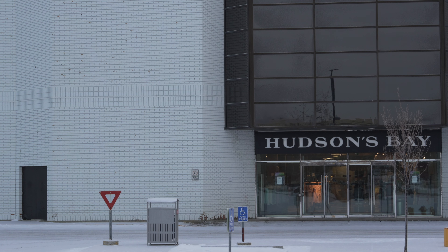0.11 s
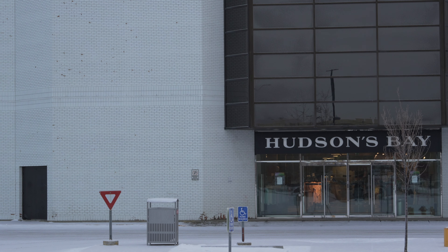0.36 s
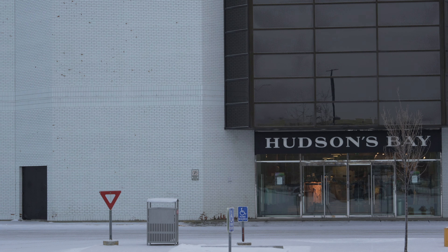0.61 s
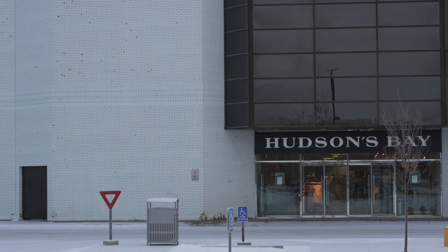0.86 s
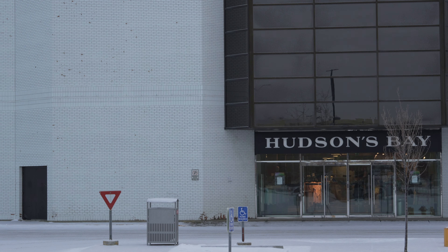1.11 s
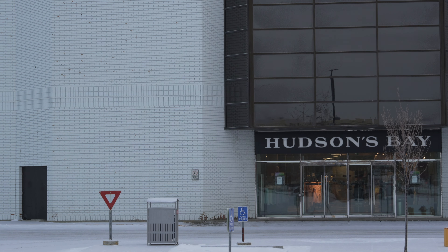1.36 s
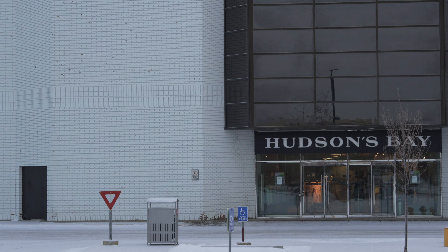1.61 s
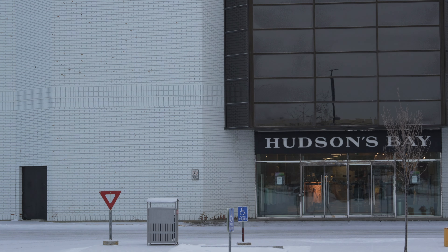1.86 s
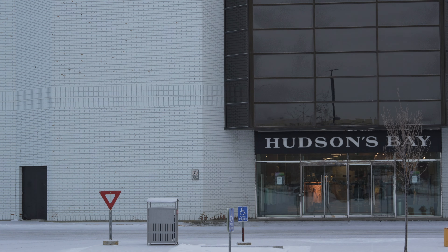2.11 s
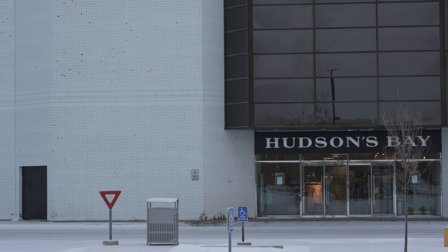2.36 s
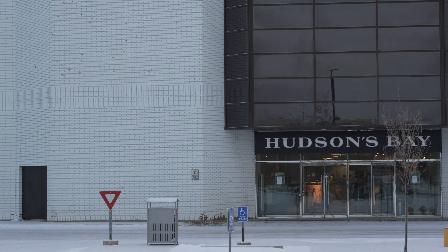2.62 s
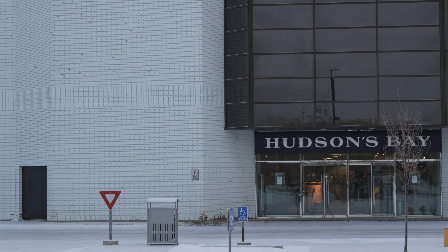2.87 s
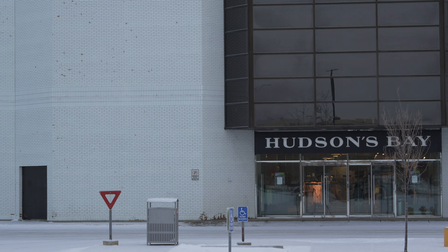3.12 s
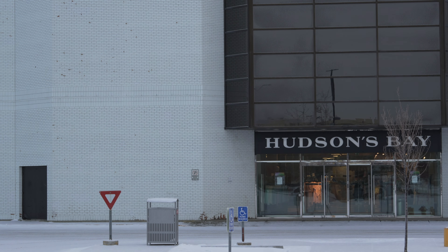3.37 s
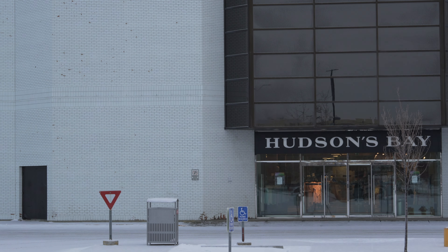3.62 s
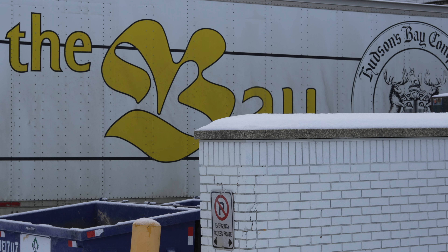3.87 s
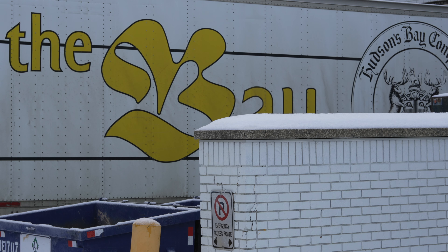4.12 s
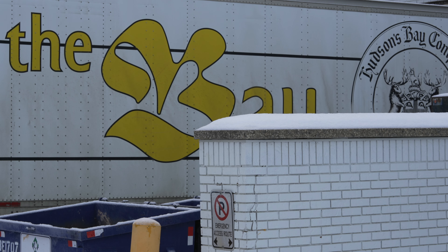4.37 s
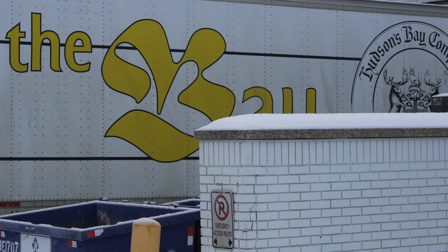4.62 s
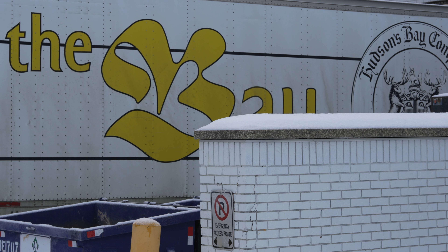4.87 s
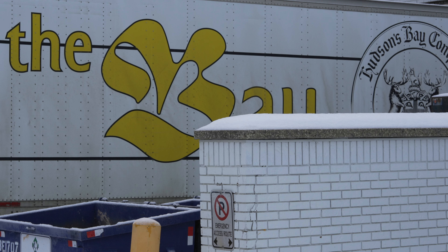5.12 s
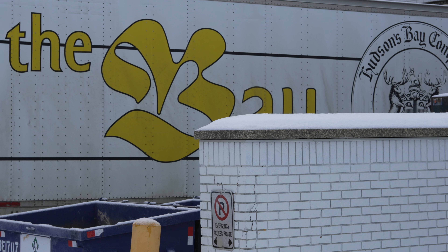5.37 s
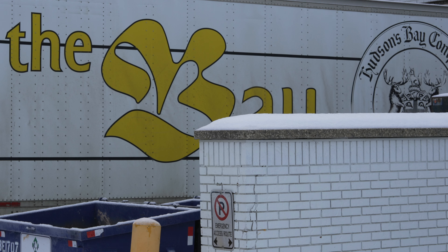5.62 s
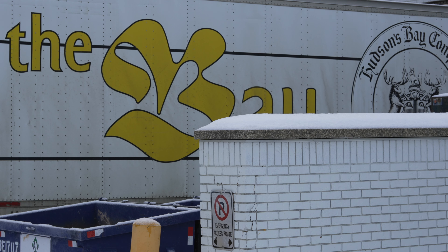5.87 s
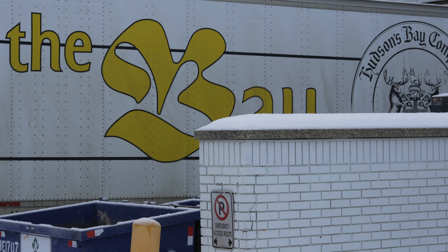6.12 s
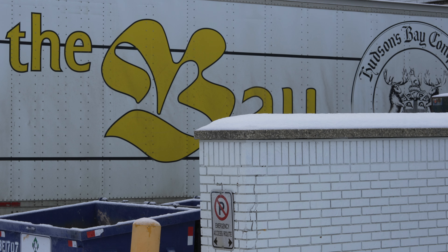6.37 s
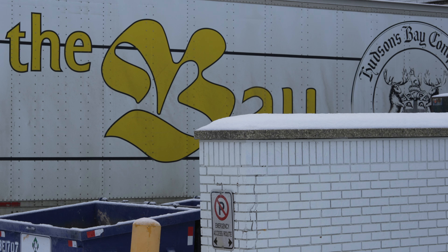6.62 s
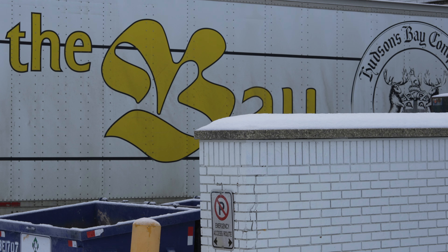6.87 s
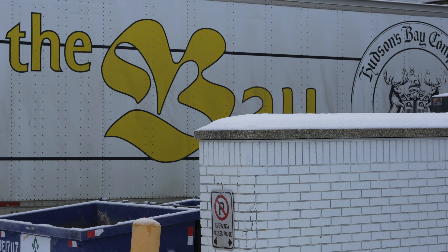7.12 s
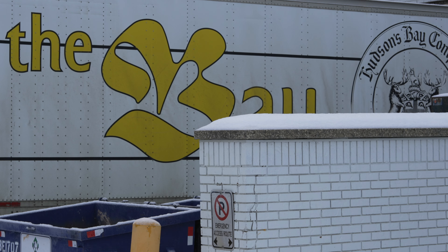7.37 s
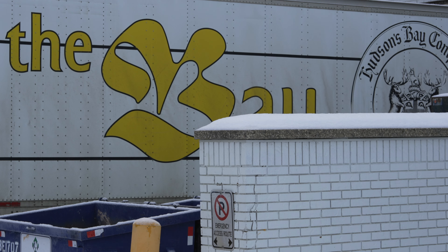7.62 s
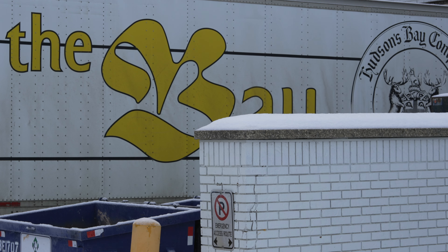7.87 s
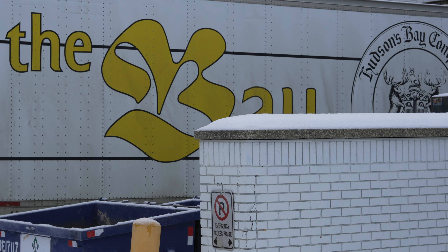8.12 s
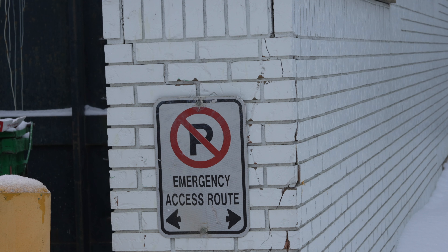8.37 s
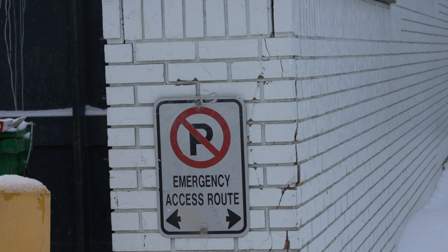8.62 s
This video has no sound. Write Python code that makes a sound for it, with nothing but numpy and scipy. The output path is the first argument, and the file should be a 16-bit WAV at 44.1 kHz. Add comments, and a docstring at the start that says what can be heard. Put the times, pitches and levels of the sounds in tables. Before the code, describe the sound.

In a snowy car park, a sweeper's fluttering broadband roar grows on the right over low town rumble, with crisp snow ticks and a few dull knocks. The sound cuts abruptly to a spot behind a wall: duller roar and a low diesel drone, slowing and wavering. A last cut brings a quieter corner, opening with a brief brushing swish close on the right. Small stereo outdoor microphone, faint hiss.

```python
"""A sweeper's roar, noise in three flickering bands, nears on the right in a snowy car park.
Three spots are heard in turn through a small stereo microphone: the roar; then a diesel, a sum of
slowing sine orders, behind a wall with the roar dulled; then a quieter corner, opening with a brushing
swish of dense random grains. Snow ticks as random short rings; gusts thump as low noise pushes.
Town rumble, coloured noise with wavering and briefly swelling sine hums, lies beneath, with faint hisses."""
import sys
import numpy as np
from scipy import signal
from scipy.fft import rfft, irfft
from scipy.io import wavfile
from scipy.ndimage import uniform_filter1d

SR = 44100
rng = np.random.default_rng(int(sys.argv[2]) if len(sys.argv) > 2 else 0)


def log_audio(samples):
    """Write samples as a 16-bit WAV file to the path given in sys.argv[1]."""
    # one column per channel
    frames = np.atleast_2d(samples).T
    # limit to full scale, then quantise
    limited = np.clip(frames, -1, 1)
    pcm = np.round(limited * 32767).astype(np.int16)
    wavfile.write(sys.argv[1], SR, pcm)


def decibels_to_gain(level_db):
    """Convert a level in decibels to a linear amplitude gain (20 dB per decade)."""
    exponent = np.asarray(level_db, float) / 20
    return 10 ** exponent


N = 384993
T = np.arange(N) / SR  # time of each sample, s
F = np.fft.rfftfreq(N, 1 / SR)  # frequency of each bin, Hz

# moments at which the listening spot changes: time_s
SPOT_CHANGES = [3.861, 8.366]
# phase lead of the left port over the right, negative when late: frequency_hz, lead_rad
PORT_LEAD = [(400, 0), (1030, .1), (1980, -.3), (3190, -2.), (4480, -2.8), (6290, -3.1), (7750, -6.4),
             (13200, -11.6)]


def level(x, db):
    """Normalisation: scale to an rms level."""
    return x * decibels_to_gain(db) / np.sqrt(np.mean(x ** 2))


def over_hz(table):
    """Interpolation on a logarithmic frequency axis, to every bin."""
    hz, value = np.transpose(table)
    return np.interp(np.log(F + 1), np.log(hz + 1), value)


def over_time(rows):
    """Linear interpolation of each column to every sample."""
    s, *columns = np.transpose(rows)
    return [np.interp(T, s, column) for column in columns]


def by_spot(rows):
    """Stepwise change: the columns of a table with one row per spot, on every sample."""
    return np.asarray(rows, float)[np.searchsorted(SPOT_CHANGES, T)].T


def walk(rate):
    """Slow random variation with spread near 1: held noise smoothed by two moving averages."""
    hold = int(SR / rate)
    steps = np.repeat(rng.standard_normal(N // hold + 1), hold)
    return 1.046 * uniform_filter1d(uniform_filter1d(steps, hold), hold)[:N]


def bump(centre_s, length_s):
    """Gaussian envelope, falling to 1/e one length from its centre."""
    return np.exp(-((T - centre_s) / length_s) ** 2)


def sides(pan_db):
    """Interaural level difference: left and right gains, positive toward the left."""
    return decibels_to_gain(np.array([pan_db, -pan_db]) / 2)


def ports(shared, own, colour, lean_db):
    """Partial coherence: a shared wave phase-shifted on the left, plus each port's own noise."""
    # power share common to both ports: frequency_hz, share_0_to_1
    coherence = [(40, .998), (70, .995), (120, .997), (200, .996), (380, .96), (640, .84), (1400, .58),
                 (3100, .55), (5500, .58), (8000, .3), (15000, .2)]
    alike = np.clip(over_hz(coherence), 0, 1)
    turn = np.exp(1j * over_hz(PORT_LEAD) * np.array([[1], [0]]))
    both = np.sqrt(alike) * turn * rfft(shared) + np.sqrt(1 - alike) * rfft(own)
    return level(irfft(both * decibels_to_gain(over_hz(colour)) * sides(lean_db), N), 0)


def noise(colour, lean_db):
    """Spectral shaping: coloured stereo noise at 0 dB rms, leaning to one side above the bass."""
    # how much of the lean applies: frequency_hz, share_0_to_1
    lean_share = [(200, 0), (380, .12), (700, .6), (1290, 1), (2380, 1), (4400, .35), (8000, 0)]
    return ports(rng.standard_normal(N), rng.standard_normal((2, N)), colour, lean_db * over_hz(lean_share))


def patchy(x, slow_db, quick_db):
    """Independent band modulation: neighbouring bands surge and flicker on their own."""
    # borders between bands: edge_hz
    band_edges = (90, 140, 210, 300, 420, 560, 750, 1000, 1350, 1800, 2400)
    below = [0 * F] + [1 / (1 + (F / hz) ** 8) for hz in band_edges] + [1 + 0 * F]
    spectrum = rfft(x)
    out = 0
    for lower, upper in zip(below, below[1:]):
        flicker = decibels_to_gain(slow_db * walk(5) + quick_db * walk(35))
        out = out + flicker * irfft(spectrum * (upper - lower), N)
    return out


def spots():
    """Gain switching: the first two spots crossfade; the last fades in from silence."""
    fade_out_s, fade_in_s = .0004, .009
    a, b = SPOT_CHANGES
    first = np.clip((a - T) / fade_out_s, 0, 1)
    second = (1 - first) * np.clip((b - T) / fade_out_s, 0, 1)
    third = np.clip((T - b) / fade_in_s, 0, 1)
    return first, second, third


def sweeper():
    """Broadband flow noise: casing drone, fan roar and brush hiss flutter apart; the wall dulls them."""
    # roar spectrum in the open: frequency_hz, density_db
    roar_open = [(120, -23), (170, 6), (280, -5), (400, -1.5), (534, -1.5), (892, -0.5), (1280, -5),
                 (1700, -13.5), (2200, -19), (2800, -22), (3500, -33), (4800, -37), (5800, -41.5),
                 (7500, -44.5), (9000, -52)]
    # roar spectrum behind the wall: frequency_hz, density_db
    roar_behind = [(200, -3.5), (330, -2.5), (520, 1), (800, -1.5), (1300, -4.5), (1900, -11.5),
                   (2400, -17.5), (2900, -27), (3600, -42), (5000, -63)]
    # loudness course: time_s, level_db, brush_over_level_db, drone_over_level_db
    sweep_course = [(0, -57.5, 11, 0), (.4, -47, -4, -4), (.8, -53, -8, 4), (1.15, -47, -8, 0.5),
                    (1.5, -44.5, 0, -1.5), (2.0, -45, 5, 5.5), (2.4, -45, 5.5, 3.5), (2.8, -43.5, 8, -0.5),
                    (3.05, -42, 3.5, -1.5), (3.45, -41, 2.5, -1), (3.85, -41, 4, -2), (3.87, -47, 3.5, -5),
                    (4.3, -48, 5, 3), (4.7, -45, -4.5, -0.5), (5.2, -48, 1.5, -3.5), (5.6, -50, 2.5, -2),
                    (6.1, -53, 0, 3), (6.5, -50.5, -2, -1), (6.9, -53, 7, -11), (7.3, -52, 7, -13),
                    (7.6, -49.5, 1, -12), (7.8, -52, -2, -6), (8.1, -50, 0, -6), (8.36, -49.5, 0, -8)]
    # brief flares of drone and fan: centre_s, rise_db, length_s
    roar_flares = [(2.03, 3, .03), (3.0, 4, .025)]
    # borders of drone, fan and brush: edge_hz
    part_edges = (700, 2250)
    flare_db = sum(db * bump(s, length) for s, db, length in roar_flares)
    first, second, _ = spots()
    roar = first * noise(roar_open, -14) + second * noise(roar_behind, -3.5)  # both lean right, dB
    spectrum = rfft(patchy(roar, slow_db=0.94, quick_db=1.5))
    low, below_top = (1 / (1 + (F / hz) ** 6) for hz in part_edges)
    drone = irfft(spectrum * low, N)
    fan = irfft(spectrum * (below_top - low), N)
    brush = irfft(spectrum * (1 - below_top), N)
    level_db, brush_db, drone_db = over_time(sweep_course)
    parts = decibels_to_gain(drone_db + flare_db + 1.2 * walk(20)) * drone
    parts = parts + decibels_to_gain(flare_db + .5 * walk(20)) * fan
    parts = parts + decibels_to_gain(brush_db + 1.7 * walk(9.4)) * brush
    return decibels_to_gain(level_db + 0.45 * walk(12)) * parts


def clanks():
    """Modal resonance: dull knocks ring the sweeper's casing modes, louder on the right."""
    # knocks, before mode gains and panning: time_s, drive_db
    casing_knocks = [(2.033, -33), (2.953, -36), (2.993, -22)]
    # casing modes: frequency_hz, gain_db, t60_s
    casing_modes = [(820, -1, .04), (940, -6, .035), (1240, -10, .03)]
    out = 0
    for s, db in casing_knocks:
        age = np.clip(T - s, 0, None)
        onset = 1 - np.exp(-(age / .0015) ** 2)
        ring = sum(decibels_to_gain(gain_db - 60 * age / t60) * np.sin(2 * np.pi * hz * age)
                   for hz, gain_db, t60 in casing_modes)
        out = out + decibels_to_gain(db) * onset * ring
    return out * sides(-7)[:, None] / 2


def diesel():
    """Harmonic orders: the lowest multiples of a slowing firing rate come round the wall."""
    # firing rate: time_s, rate_hz
    firing_rate = [(3.87, 58.6), (4.27, 57.5), (4.74, 56.9), (5.0, 55.8), (5.57, 54.4), (5.75, 53.4),
                   (6.2, 53.1), (6.45, 50.9), (6.75, 50.7), (6.9, 49.9), (7.2, 49.1), (7.57, 47.8),
                   (7.89, 46.4), (8.36, 46.4)]
    # firing tone: time_s, rms_db
    firing_tone = [(3.87, -45), (4.15, -46), (4.3, -35.5), (4.7, -32), (5.0, -32), (5.3, -30), (5.7, -32.5),
                   (5.9, -33.5), (6.1, -39), (6.28, -40), (6.42, -50), (6.55, -34.5), (6.9, -31.5),
                   (7.3, -46.5), (7.55, -47), (7.86, -35), (8.1, -36), (8.36, -39.5)]
    # second order: time_s, rms_db
    second_order = [(3.87, -48), (4.7, -51), (5.3, -69), (5.7, -47), (6.0, -44), (6.35, -46.5), (6.55, -54),
                    (6.9, -45.5), (7.1, -48), (7.3, -57), (7.55, -43), (7.8, -45), (8.0, -49),
                    (8.15, -41.5), (8.36, -47.5)]
    # higher orders: time_s, third_rms_db, fourth_rms_db
    upper_orders = [(3.87, -50, -60), (4.4, -51.5, -57), (4.65, -42.5, -60), (4.85, -54, -63),
                    (5.2, -53, -54.5), (5.6, -60, -66), (6.1, -53.5, -63), (6.6, -61, -59), (7.0, -60, -58),
                    (7.4, -59, -60), (7.7, -66, -56), (8.36, -66, -67)]
    rate_hz = over_time(firing_rate)[0] * (1 + .0015 * walk(9))
    turn = 2 * np.pi * np.cumsum(rate_hz) / SR
    out = decibels_to_gain(over_time(firing_tone)[0] + 0.81 * walk(25)) * np.sin(turn)
    out = out + decibels_to_gain(over_time(second_order)[0] + 1.5 * walk(7.5)) * np.cos(2 * turn)
    third_db, fourth_db = over_time(upper_orders)
    out = out + decibels_to_gain(third_db + 1.5 * walk(6)) * np.sin(3 * turn)
    out = out + decibels_to_gain(fourth_db + 1.5 * walk(6)) * np.cos(4 * turn)
    late = np.roll(out, 3)  # the left port, 3 samples behind
    return np.sqrt(2) * np.array([late, out])


def grains(rate, spread_db, top_db):
    """Poisson-like impacts: many faint and few strong, in one shared and two separate rows."""
    hit = rng.random((3, N)) < rate / SR
    size_db = np.minimum(spread_db * rng.exponential(size=(3, N)), top_db)
    return hit * rng.choice([-1, 1], (3, N)) * decibels_to_gain(size_db)


def snow_and_swish():
    """Shot noise: filtered random grains make steady snow patter, flurries and a brushing swish."""
    # bright and dull ring spectra: frequency_hz, density_db
    bright_ring, dull_ring = [(8000, -28), (9300, -2), (11000, 0.5), (12800, 4), (14200, -1), (15200, 0),
                              (16000, -21)], [(1500, -28), (2500, -8), (3500, -7.5), (5000, -1),
                                                 (6000, 1), (7300, -3.5), (8600, -6), (9500, -35)]
    # steady patter, one row per spot: bright_level_db, dull_over_bright_db, left_minus_right_db
    steady_patter = [(-87, -3.5, -15), (-78.5, -5, -2), (-83.5, -24, -23)]
    # bursts, snow flurries at the first two spots; at the last a brushing swish,
    # likely a jacket rustling close on the right: peak_s, peak_db, rise_s, fall_s
    burst_rows = [(2.88, -65, .12, 0.19), (3.28, -63, 0.1, 0.2), (3.58, -73, 0.064, 0.11),
                  (3.87, -70.5, .01, 0.092), (4.0, -76, 0.036, 0.06), (4.1, -80, .04, 0.07),
                  (4.26, -79, 0.065, 0.075), (4.5, -85, 0.18, 0.073), (4.74, -82, 0.03, .15),
                  (7.76, -83, 0.048, 0.1), (8.39, -61, 0.02, 0.051), (8.435, -68.5, 0.025, 0.053),
                  (8.5, -80, .025, .09)]
    # burst tone, one row per spot: dull_over_bright_db, left_minus_right_db
    burst_tone = [(-15, -9.5), (-9, -16), (-5, -16)]
    fall_shape = 1.17  # exponent: 1 trails off, 2 stops short
    hits = grains(6000, spread_db=3.4, top_db=22)
    bright, dull = (ports(hits[0], hits[1:], ring, 0 * F) for ring in (bright_ring, dull_ring))
    steady_db, dull_db, pan_db = by_spot(steady_patter)
    out = decibels_to_gain(steady_db) * (bright + decibels_to_gain(dull_db) * dull) * sides(pan_db)
    burst = 0
    for s, db, rise, fall in burst_rows:
        rising = ((T - s) / rise) ** 2
        falling = np.abs((T - s) / fall) ** fall_shape
        burst = burst + decibels_to_gain(db) * np.exp(-np.where(T < s, rising, falling))
    dull_db, pan_db = by_spot(burst_tone)
    out = out + burst * (bright + decibels_to_gain(dull_db) * dull) * sides(pan_db)
    return out * decibels_to_gain(1.3 * walk(70) + 1.3 * walk(20))


def stray_ticks(count=24):
    """Random arrivals: faint grains at chance moments, ringing dull or bright."""
    middle_db, spread_db = -69, 8
    dull_hz, bright_hz = 6700, 12600
    when, size, kind = rng.random((count, 3)).T
    size_db = middle_db + spread_db * (2 * size - 1)
    return [(s * (T[-1] - .01), db, bright_hz if k > .5 else dull_hz, db - 14, -10)
            for s, db, k in zip(when, size_db, kind)]


def ticks():
    """Impact excitation: single hard grains ring a few cycles and knock the housing."""
    # grains, before panning: time_s, ring_envelope_peak_db, ring_hz, knock_mode_db, left_minus_right_db
    hard_grains = [(1.886, -53, 10500, -70, -10), (2.1086, -49, 10000, -44, -10),
                   (2.137, -59, 13500, -75, 10), (2.6362, -61, 8500, -49, -10),
                   (2.783, -53, 9000, -48, -10), (2.9037, -38, 13000, -65, -12),
                   (2.9524, -41, 10500, -58, -11), (2.968, -41, 11500, -58, -12),
                   (3.143, -37, 12900, -58, -14), (3.238, -44, 12500, -68, -11),
                   (3.312, -38, 11000, -64, -8), (3.3807, -42, 11000, -54, -18),
                   (3.4062, -39, 12500, -53, -19), (3.5224, -48, 13100, -68, -12),
                   (3.6262, -49, 13000, -75, -12), (3.6455, -45, 13000, -62, -14),
                   (3.6525, -46, 12000, -62, -14), (3.879, -49, 12500, -70, -18),
                   (3.9204, -50, 11900, -67, -18), (3.9664, -58, 12000, -60, -15),
                   (3.9864, -54, 13500, -80, -18), (4.008, -55, 10000, -60, -15),
                   (4.064, -56, 11000, -72, -15), (4.1275, -49, 12500, -55, -12),
                   (4.139, -56, 13000, -62, -12), (4.1754, -57, 12000, -80, -15),
                   (4.1874, -51, 13200, -80, -20), (4.2457, -48, 13600, -74, -20),
                   (4.2625, -55, 12500, -80, -18), (4.2825, -50, 11500, -75, -18),
                   (4.425, -52, 11000, -75, -15), (4.4687, -51, 13200, -73, -20),
                   (4.7242, -55, 13000, -78, -18), (4.7708, -55, 12000, -60, -14),
                   (4.8712, -63, 7500, -64, -13), (4.9065, -63, 6200, -70, -13),
                   (4.962, -64, 7500, -66, -13), (4.9862, -61, 5540, -65, 16), (5.65, -66, 6000, -66, -12),
                   (5.7728, -56, 13500, -80, 15), (6.0995, -60, 10500, -70, -13),
                   (6.225, -66, 7500, -70, -3), (6.357, -57, 7000, -60, -4), (6.993, -55, 11000, -69, -15),
                   (7.12, -68, 6000, -66, -10), (7.223, -70, 6000, -65, -10), (7.2755, -70, 6000, -65, -10),
                   (7.5587, -66, 9000, -65, -12), (7.7313, -62, 10000, -62, -12),
                   (7.8426, -64, 10000, -64, -12), (8.1927, -58, 11100, -74, -15),
                   (8.2415, -57, 12500, -64, -12), (8.3793, -47, 13000, -58, -17),
                   (8.3883, -43, 13000, -60, -17), (8.3957, -43, 12000, -55, -20),
                   (8.415, -48, 12500, -62, -19), (8.431, -45, 12000, -55, -19),
                   (8.4895, -52, 13500, -70, -19), (8.5025, -48, 12500, -63, -19),
                   (8.53, -53, 12000, -75, -19), (8.5674, -57, 9500, -73, -12),
                   (8.6351, -56, 13300, -80, -20), (8.6525, -62, 12000, -66, -9),
                   (8.6935, -50, 14000, -80, -17), (8.7025, -57, 12500, -80, -18),
                   (8.7162, -58, 13000, -82, -14)]
    # modes of the microphone housing: frequency_hz
    housing_modes = (4700, 6800)
    ring_cycles = 1.7  # cycles per unit of age; the ring peaks at half a unit
    out = np.zeros((2, N))
    t = np.arange(200) / SR
    for s, db, hz, knock_db, pan_db in hard_grains + stray_ticks():
        i = int(s * SR)
        age = t * hz / ring_cycles
        envelope = np.e * 2 * age * np.exp(-2 * age)
        ring = decibels_to_gain(db) * envelope * np.sin(2 * np.pi * hz * t)
        housing = sum(np.sin(2 * np.pi * mode_hz * t) for mode_hz in housing_modes)
        knock = decibels_to_gain(knock_db) * np.exp(-t / 0.00026) * housing
        out[:, i:i + len(t)] += (ring + knock) * sides(pan_db)[:, None]
    left = irfft(rfft(out[0]) * np.exp(1j * over_hz(PORT_LEAD)), N)
    return np.array([left, out[1]])


def gusts():
    """Wind buffeting: short pushes of low-band noise, partly opposite on the two ports."""
    # pushes: centre_s, shared_level_db, length_s
    gust_pushes = [(3.929, -30.5, 0.011), (4.313, -42.5, 0.12), (4.533, -43, 0.12), (6.276, -46, 0.058),
                   (6.38, -47, 0.13), (8.424, -37.5, 0.012)]
    push = sum(decibels_to_gain(db) * bump(s, length) for s, db, length in gust_pushes)
    low_band = signal.butter(4, [45, 190], "band", fs=SR, output="sos")
    air = signal.sosfilt(low_band, rng.standard_normal((2, N)))
    both, apart = level(air, 0)
    return push * (both + 0.29 * apart * np.array([[1], [-1]]))


def enveloped_sines(table, rough):
    """Phase modulation: sines rise and fade alike in both ports; a trembling phase roughens them."""
    shake = rough * walk(400)
    out = 0
    for s, hz, db, length in table:
        out = out + np.sqrt(2) * decibels_to_gain(db) * bump(s, length) * np.sin(2 * np.pi * hz * T + shake)
    return out


def squeaks():
    """Strong phase jitter: faint sines become rough squeaks."""
    # squeaks: centre_s, pitch_hz, peak_rms_db, length_s
    rough_squeaks = [(4.975, 5550, -83, .006), (4.99, 5550, -80, .005), (5.013, 5550, -81, .009),
                     (5.09, 5450, -85, .005), (6.88, 2900, -75, .02), (7.235, 3620, -86, .015),
                     (7.27, 3620, -78, .015), (7.79, 3300, -85, .02), (8.065, 3900, -86, .01),
                     (8.07, 3320, -81, .03), (8.16, 3300, -84, .03)]
    return enveloped_sines(rough_squeaks, rough=.9)


def airy():
    """Stationary filtered noise: a smooth treble hiss without grain, swelling on the left."""
    # loudness course: time_s, level_db
    airy_course = [(0, -80), (1.0, -76), (1.7, -77), (1.95, -70.5), (2.6, -70), (3.05, -66.5), (3.5, -68.5),
                   (3.85, -69)]
    # spectrum: frequency_hz, density_db
    airy_colour = [(3200, -11), (4200, -2), (4900, -2), (5900, -7), (6600, -5), (7400, 1), (8100, -4),
                   (8900, -7), (10500, -2), (12800, 4.5), (14200, -5), (15000, -12), (16000, -17)]
    left_lean_db = 20 + 0 * F
    hiss = ports(rng.standard_normal(N), rng.standard_normal((2, N)), airy_colour, left_lean_db)
    return decibels_to_gain(over_time(airy_course)[0] + .5 * walk(10)) * hiss


def brief_hums():
    """Amplitude envelopes: brief low hums swell and fade within the rumble."""
    # hums: centre_s, pitch_hz, peak_rms_db, length_s
    brief_hum_rows = [(.3, 149.2, -48, 0.16), (1.15, 168, -44, 0.074), (1.9, 139.7, -46, 0.16),
                      (2.03, 120, -42, 0.055), (3.7, 124.7, -48, 0.17), (.6, 150, -45, 0.15),
                      (1.002, 140.7, -47.5, 0.22), (3.504, 151.6, -41.5, 0.062), (3.5, 173.6, -45, 0.099),
                      (6.2, 147.2, -47, 0.24), (7.502, 130.8, -42, 0.12), (7.946, 169.6, -44, 0.21),
                      (8.55, 191.4, -49.5, 0.18)]
    return enveloped_sines(brief_hum_rows, rough=.1)


def hums(spot):
    """Frequency modulation: sine hums from the building waver in pitch and level."""
    # a list per spot: pitch_hz, arrival_rms_db, change_db_per_s
    hum_rows = [
        [(59.4, -43, -1.2), (122, -54.5, 0), (544.5, -58.5, 0)],
        [(76.2, -47.5, 0), (120, -47, -0.5)],
        [(70.1, -51, 3)],
    ]
    since = T - ([0] + list(SPOT_CHANGES))[spot]
    out = 0
    for hz, db, fade_db in hum_rows[spot]:
        cycles = np.cumsum(hz * (1 + 0.005 * walk(4.0))) / SR
        strength = decibels_to_gain(db + fade_db * since + 1.0 * walk(2.95))
        out = out + np.sqrt(2) * strength * np.sin(2 * np.pi * cycles)
    return out


def town(spot):
    """Superposed far sources: traffic and ventilation as flickering coloured noise, with hums."""
    # rumble spectrum, a list per spot: frequency_hz, density_db
    town_colour = [
        [(20, -11.5), (34, -4), (45, -7), (60, -3.5), (92, -8), (154, -5.5), (198, -10), (285, -14.5),
         (400, -20.5), (540, -16), (700, -20.5), (1220, -26), (1500, -32.5), (2600, -42), (3400, -50.5),
         (5000, -66.5)],
        [(20, -7.5), (33, -0.5), (50, -9), (65, -7), (134, -7), (255, -13.5), (310, -20), (430, -28),
         (600, -23.5), (700, -21), (810, -20), (930, -23.5), (1030, -26), (1400, -35.5), (1910, -37.5),
         (2745, -51.5), (2762, -40), (2785, -53), (2900, -56), (3220, -53), (3330, -50), (3450, -55),
         (5000, -78)],
        [(20, 0.5), (65, -0.5), (142, -1.5), (190, 2), (230, -3), (347, -16.5), (500, -18), (800, -16),
         (1300, -28.5), (2000, -38), (2700, -42), (3100, -52), (4200, -72)],
    ]
    # rumble level per spot, before flicker: level_db
    town_level = [-37.5, -39.5, -45]
    # side of the rumble above the bass, per spot: left_minus_right_db
    town_side = [-4.5, -1.7, -3.5]
    rumble = noise(town_colour[spot], town_side[spot]) * decibels_to_gain(town_level[spot] + .4 * walk(5))
    return patchy(rumble, slow_db=0.85, quick_db=1.26) + hums(spot)


def scene():
    """Linear superposition: each spot has its own town; the machines are absent at the last one."""
    first, second, third = spots()
    machines = (first + second) * sweeper() + clanks() + second * diesel()
    near = snow_and_swish() + ticks() + gusts()
    everywhere = (first + second + third) * (near + squeaks() + brief_hums())
    towns = first * (town(0) + airy()) + second * town(1) + third * town(2)
    return machines + everywhere + towns


def microphone_hiss():
    """Self-noise: the microphone's own steady coloured hiss."""
    # spectrum: frequency_hz, density_db
    hiss_colour = [(2240, -22), (3800, -5), (4520, -2.5), (8610, -12.5), (12600, -6.5), (15100, -12),
                   (16000, -7.5)]
    return decibels_to_gain(-75) * noise(hiss_colour, 0)


def low_pass(x):
    """Removes everything above the highest recorded frequency."""
    return signal.sosfilt(signal.butter(12, 16140, fs=SR, output="sos"), x)


def record(dry):
    """Additive noise: the microphone adds its hiss to the scene."""
    mix = dry + microphone_hiss()
    return low_pass(mix)


dry = scene()
out = record(dry)
log_audio(out)
```